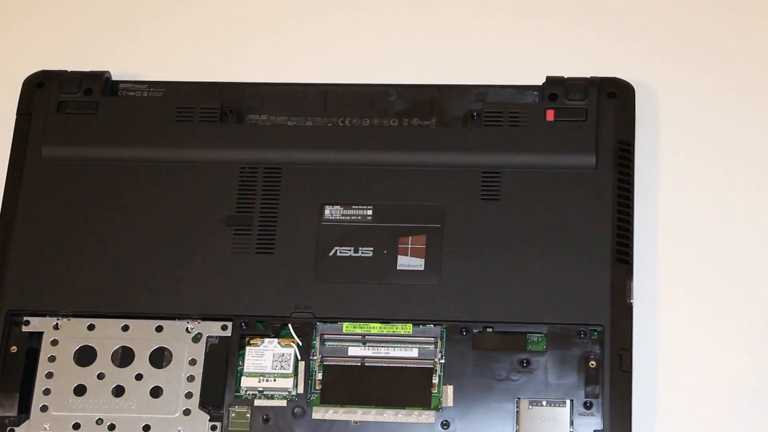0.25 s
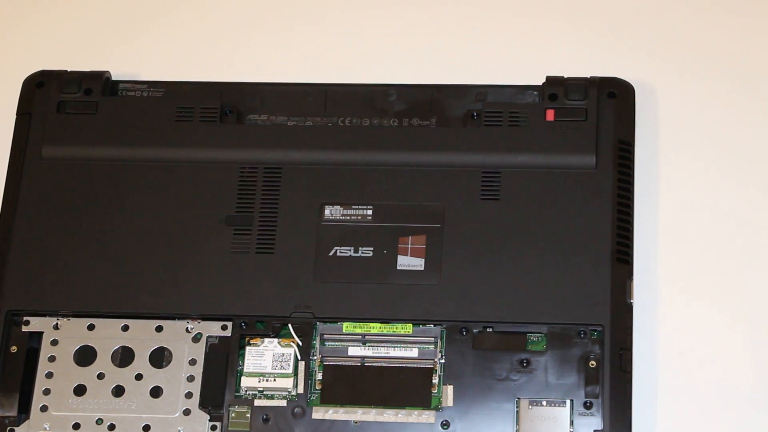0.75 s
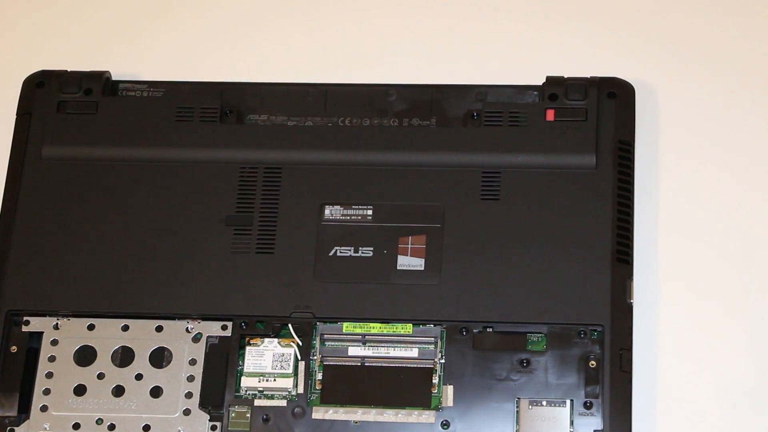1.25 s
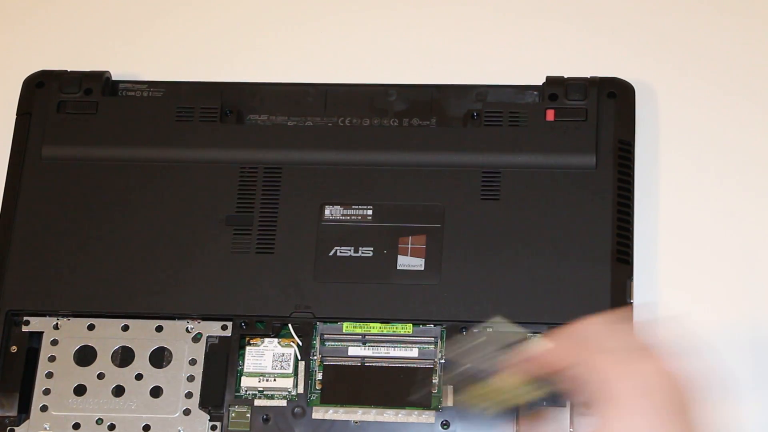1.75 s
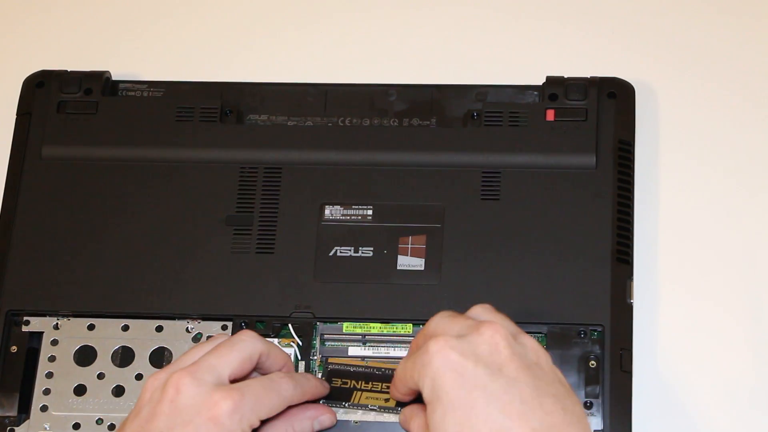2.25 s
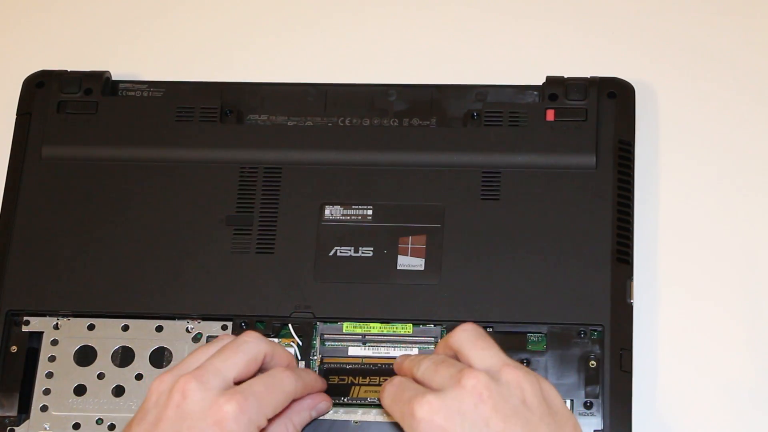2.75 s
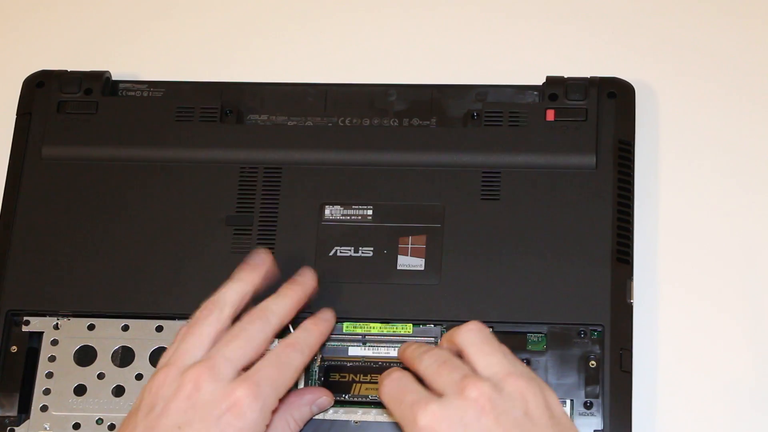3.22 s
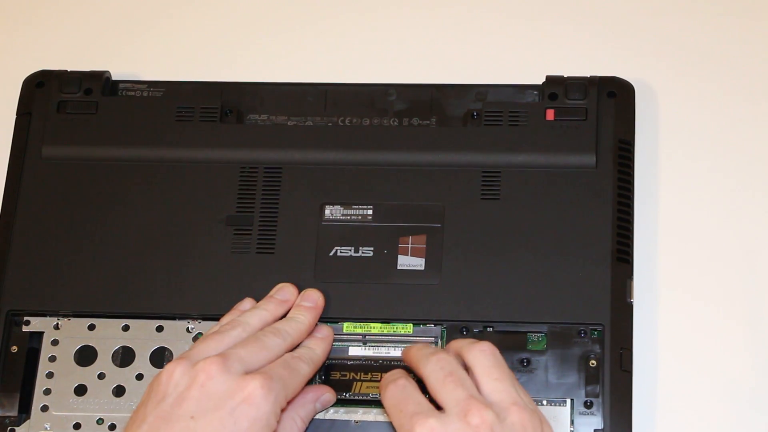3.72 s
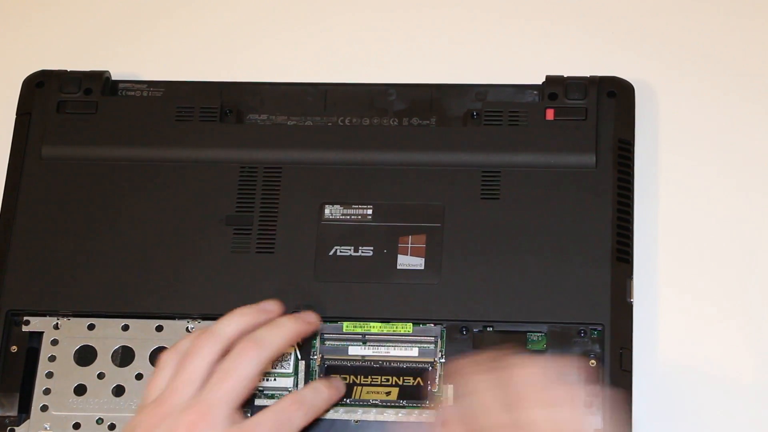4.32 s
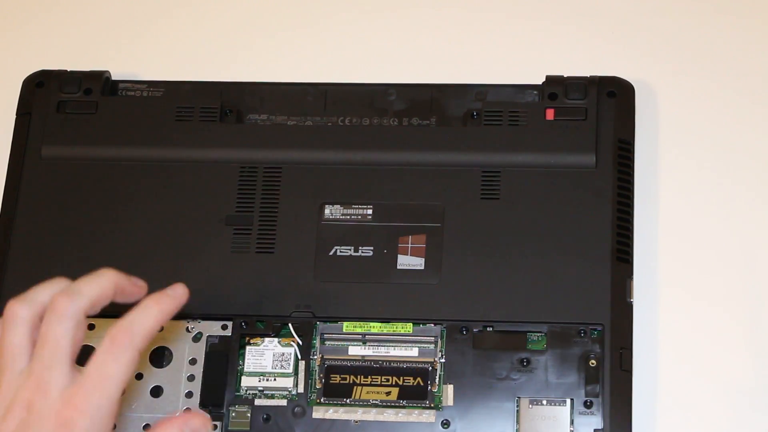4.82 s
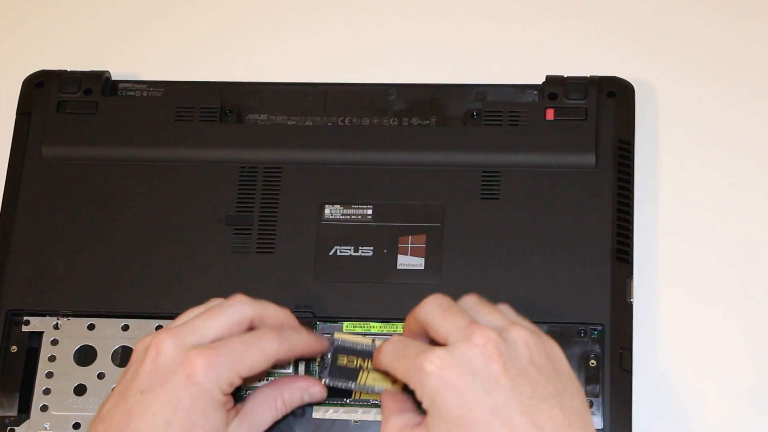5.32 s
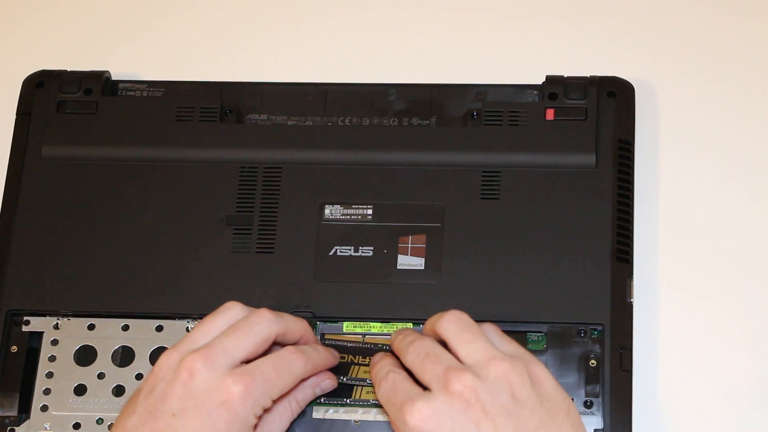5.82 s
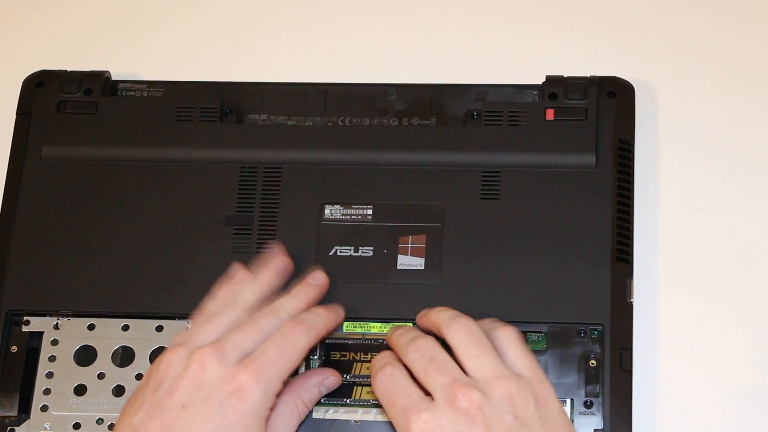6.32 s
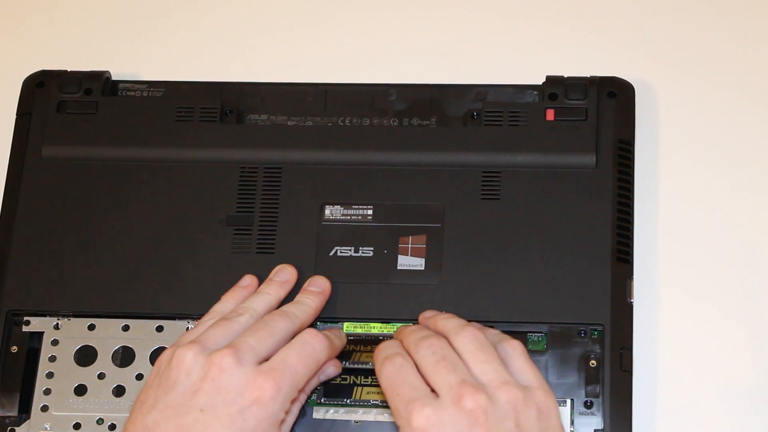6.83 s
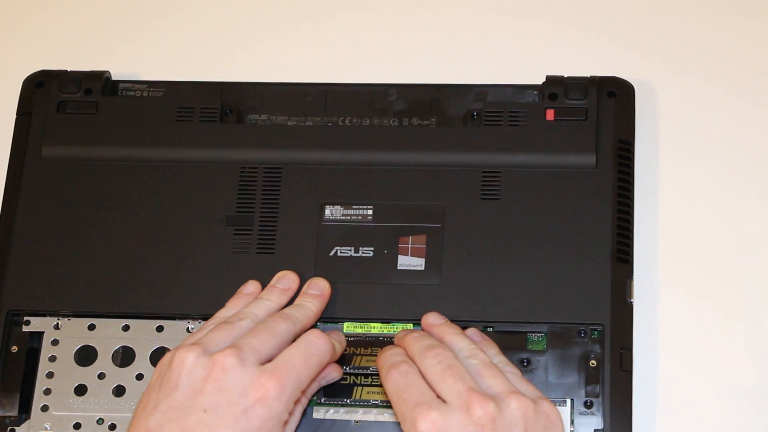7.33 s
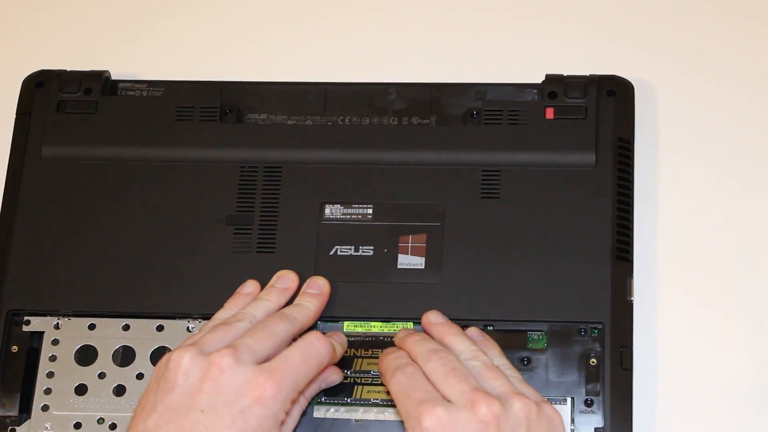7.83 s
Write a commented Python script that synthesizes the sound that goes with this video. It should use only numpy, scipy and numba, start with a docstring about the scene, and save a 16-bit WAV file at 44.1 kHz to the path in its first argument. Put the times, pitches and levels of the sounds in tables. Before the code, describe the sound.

Two small circuit boards are fitted into the underside of a laptop lying on a desk. A sharp snap comes early, then light plastic clicks, taps and fingertip scuffs. Midway a latch snaps loudly, with a brief metallic ring and a low thump from the desk. Softer ticks and scrapes follow. One microphone above the desk picks up a bare room's short echo and a low ventilation hum.

```python
"""Circuit boards snapping into a laptop.

Two small boards are slid into slots in the underside of a laptop lying on a desk, then pressed until
the latches snap. Taps ring the case, the board and the latches; fingertips scuff plastic; the desk
booms under the hands. A bare room echoes it over a low ventilation hum. One microphone above the desk."""
import sys
import numpy as np
from scipy import signal
from scipy.fft import rfft, irfft, next_fast_len
from scipy.io import wavfile
from scipy.ndimage import uniform_filter1d
from numba import njit

SR = 44100
rng = np.random.default_rng(int(sys.argv[2]) if len(sys.argv) > 2 else 0)


def transcribe(u):
    """Save the signal u as a 16-bit wav file named by the first command-line argument.

    u: samples, shape (n,) or (channels, n), limited to [-1, 1]; the rate is SR.
    q: integer samples, one column per channel.
    """
    v = np.clip(np.atleast_2d(u).T, -1, 1)
    q = np.round(v * 32767).astype(np.int16)
    wavfile.write(sys.argv[1], SR, q)


N = 355842

# hands moving on the case: t/s, dull rub/dB, bright scuff/dB
HAND_LEVELS = [(0.1, -52, -62), (0.399, -53, -60), (0.85, -92, -85), (1.19, -59.5, -89),
               (1.41, -56.5, -53.5), (1.6, -59, -67), (1.98, -67.5, -62.5), (2.2, -67, -58.5),
               (3.19, -59, -73), (3.37, -57, -55), (3.659, -76, -59.5), (4.25, -58, -57.5),
               (4.522, -63.5, -90), (4.85, -73.5, -47.5), (5.19, -62.5, -78), (5.9, -60, -57.5),
               (7.55, -68.5, -78), (8.07, -51.5, -43.5)]


def undb(db):
    """dB to gain."""
    return 10 ** (np.asarray(db) / 20)


def unit(x):
    """Scale to rms 1."""
    return x / np.sqrt(np.mean(x ** 2))


def ring(x, modes, passes=1):
    """Parallel resonances (f/Hz, width/Hz, level/dB); alternate signs avoid notches between them."""
    for _ in range(passes):
        x = sum((-1) ** k * undb(db) * signal.lfilter(*signal.iirpeak(hz, hz / width, SR), x)
                for k, (hz, width, db) in enumerate(modes))
    return x


def walk(rate_hz):
    """Random levels, each held for one period and slewed; spread near 1."""
    hold = int(SR / rate_hz)
    return uniform_filter1d(np.repeat(rng.standard_normal(N // hold + 1), hold), hold)[:N]


def curves(table):
    """The columns after a table's time column, one value a sample."""
    times, *columns = np.transpose(table)
    return [np.interp(np.arange(N) / SR, times, column) for column in columns]


@njit
def follow(x, attack, release):
    """Envelope with separate rates for rising and falling."""
    envelope, level = np.empty(len(x)), 1e-9
    for i in range(len(x)):
        level += (x[i] - level) * (attack if x[i] > level else release)
        envelope[i] = level
    return envelope


def air():
    """Steady room air and microphone hiss."""
    # spectrum of the room tone: f/Hz, relative level/dB
    spectrum = [(12, -53), (20, 2), (106, 2.5), (153, -3.5), (246, -8), (480, -14.5), (599, -18),
                (1270, -17), (1460, -28), (3670, -24), (5890, -28), (14400, -28.5), (15600, -32)]
    hz, db = np.transpose(spectrum)
    size = next_fast_len(N)
    bin_hz = np.arange(size // 2 + 1) * SR / size
    shape = undb(np.interp(np.log(bin_hz + 1), np.log(hz), db))
    return undb(-53) * unit(irfft(rfft(rng.standard_normal(size)) * shape, size)[:N])


def room(x):
    """Echoes off bare walls build within a millisecond, then die away, the treble first."""
    # reverberation bands: f/Hz, t60/s, level/dB
    bands = [(246, 0.4, -29), (607, 0.36, -26), (1400, 0.32, -33.5), (3000, 0.36, -33), (5640, 0.33, -35.5),
             (11680, 0.27, -39)]
    t = np.arange(SR // 2) / SR
    rise = np.minimum(t / 0.001, 1)
    tail = 0
    for hz, t60, db in bands:
        noise = ring(rng.standard_normal(len(t)), [(hz, hz, 0)], passes=2)
        tail += undb(db - 60 * t / t60) * rise * noise
    return signal.oaconvolve(x, tail)[:N]


def rumble():
    """Wavering lows: presses swell the desk's boom and the hum; moving hands stir the hollow case."""
    # resonances of desk, ventilation hum and hollow case: f/Hz, width/Hz, level/dB
    boom_modes = [(58.2, 20, -8), (93.2, 47, -6)]
    hum_modes = [(124.1, 7.4, 3.5), (172.1, 33, -1.5)]
    hollow_modes = [(210, 61, -0.5), (324, 53, 5), (470, 110, -0.5)]
    # the hum swells and sinks: t/s, level/dB
    hum_levels = [(0.0, -55.5), (1.1, -59), (1.6, -50), (3.1, -50), (3.7, -56.5), (8.07, -62.5)]
    # hands pressing down on the desk: t/s, t60/s, boom/dB, hum/dB
    presses = [(0.18, 0.54, -47, -71), (0.58, 0.91, -71, -48), (3.15, 1.3, -47.5, -56),
               (3.338, 0.34, -34, -50), (4.199, 0.65, -23, -29.5), (4.69, 0.8, -46.5, -44.5),
               (6.38, 1.76, -44, -46.5), (6.8, 0.37, -55.5, -54.5), (7.03, 0.64, -48, -37.5),
               (7.98, 1.1, -58, -48)]
    t, rise_s = np.arange(N) / SR, 0.012
    boom, hum = undb(-58.5), undb(curves(hum_levels)[0])
    hollow = undb(curves(HAND_LEVELS)[0] + 1)  # 1 dB over the dull rub
    for start, t60, boom_db, hum_db in presses:
        age = np.maximum(t - start, 0)
        swell = (1 - np.exp(-age / rise_s)) * undb(-60 * age / t60)
        boom += undb(boom_db) * swell
        hum += undb(hum_db) * swell
    return sum(gain * unit(ring(rng.standard_normal(N), modes, passes=2))
               for gain, modes in ((boom, boom_modes), (hum, hum_modes), (hollow, hollow_modes)))


def stick_slip(patchy_db):
    """Skin sticks and slips: dense grains of uneven size, in patches."""
    return rng.standard_normal(N) * undb(2.0 * walk(400) + patchy_db * walk(49))


def rubbing():
    """Hands rub slowly over the case and ring the plastic."""
    # plastic under a dull rub and a bright scuff: f/Hz, width/Hz, level/dB
    rub_modes = [(840, 430, -8), (1346, 200, -2.5), (2180, 380, -6.5)]
    scuff_modes = [(2300, 1900, -2.5), (3730, 590, 8.5), (4740, 6800, -3.5), (8060, 3300, -8.5)]
    return sum(undb(db) * unit(ring(stick_slip(patchy_db=2.2), modes))
               for db, modes in zip(curves(HAND_LEVELS), (rub_modes, scuff_modes)))


def swishes():
    """Fingertips and board edges scrape over plastic: a gritty hiss that swells fast and fades."""
    # quick strokes: t/s, length/ms, level/dB, centre f/Hz
    strokes = [(0.411, 55, -36, 380), (0.524, 130, -46, 4100), (0.579, 48, -32.5, 3700),
               (1.22, 110, -47.5, 3000), (1.278, 87, -39, 3860), (2.261, 37, -43, 3360),
               (2.509, 64, -45, 1990), (3.52, 110, -55.5, 3720), (3.613, 190, -53.5, 3520),
               (4.713, 118, -40, 3800), (4.724, 94, -47, 1020), (4.899, 54, -37, 3280),
               (5.368, 98, -53, 2000), (5.66, 42, -52.5, 1910), (5.854, 53, -38, 3260),
               (5.936, 33, -34, 1530), (6.356, 69, -45.5, 3400), (6.448, 113, -44, 3630),
               (6.499, 130, -48.5, 1400), (6.772, 15, -34.5, 2600), (6.796, 35, -37, 1400),
               (6.821, 37, -43.5, 3260), (7.025, 60, -46, 1050), (7.03, 125, -49, 257),
               (7.322, 35, -50.5, 3480), (7.394, 62, -44.5, 3570), (7.501, 56, -47, 3730),
               (7.914, 103, -42, 3650), (7.988, 120, -42, 3370)]
    out, friction = np.zeros(N), stick_slip(patchy_db=2.0)
    for start, ms, db, hz in strokes:
        span = slice(int(start * SR), int((start + ms / 1000) * SR))
        grit = friction[span]
        hiss = undb(db) * unit(ring(grit, [(hz, 0.92 * hz, 0)], passes=2))
        fizz_db = db - 21 + 4.5 * np.log2(hz / 1000)  # higher strokes fizz more
        fizz = undb(fizz_db) * unit(ring(grit, [(8630, 7300, 0)]))
        progress = np.minimum(np.arange(len(grit)) * 1000 / SR / ms, 1)
        out[span] += (hiss + fizz) * np.sin(np.pi * progress ** 0.45) ** 1.25
    return out


def struck_parts(blow):
    """How case, board, latch, treble crack and bare contact answer a blow, each scaled to peak 1."""
    # what every tap rings: f/Hz, width/Hz, level/dB
    case_modes = [(203, 113, 6.5), (316, 70, 9.5), (514, 196, 4), (588, 11, -3.5), (810, 207, 8.5)]
    board_modes = [(1061, 160, -8), (1400, 190, 0), (1796, 200, -6)]
    latch_modes = [(2090, 106, 13.5), (2713, 290, 3.5), (3030, 720, 5), (3724, 203, 9), (4130, 600, 3.5),
                   (4870, 280, -3)]
    crack_modes = [(6100, 1900, 6), (6940, 900, -1.5), (7860, 20000, 2.5), (10800, 900, -10)]
    parts = []
    for modes, ring_db in ((case_modes, 1.7), (board_modes, 4.7), (latch_modes, 12), (crack_modes, .51)):
        low, high = modes[0][0], modes[-1][0]
        band = [(np.sqrt(low * high), 2.074 * (high - low), 0)]
        ringing_click = ring(blow, band) + undb(ring_db) * ring(blow, modes)
        parts.append(ring(ringing_click, band, passes=2))
    contact = ring(blow, [(1900, 4800, 0)], passes=3)  # over in one cycle
    return [part / np.abs(part).max() for part in parts + [contact]]


def taps():
    """Sharp blows with chatter: returns the sound at the microphone and three feeds to the walls."""
    # contacts: t/s, click/dB, case thud/dB, crack/dB, chatter/ms, struck spot f/Hz, ping there/dB
    contacts = [(0.4105, -21, -26, -30, .3, 3300, -6), (0.5494, -30, -58, -45, .5, 4500, 1),
                (0.5638, -19, -17.5, -31, 1.2, 3400, 12), (0.5695, -9.5, -13.5, -50, -1, 940, 8),
                (0.5664, 1, -8.5, -12, 0.071, 1580, -10.5), (0.5816, -17, -38, -34, 1.4, 3730, 0),
                (0.594, -13.5, -38, -45, 0.32, 1360, 13), (1.2424, -16.5, -28, -53, 0.067, 5400, 4),
                (1.2706, -26, -38, -34, 2.1, 3030, 8), (1.294, -24.5, -38, -24.5, 8.5, 4560, 14),
                (1.4833, -35.5, -41.5, -38, 0.45, 2270, 0), (1.739, -34, -50, -53, 0.3, 2060, 22),
                (1.957, -32.5, -38.5, -57, 1.4, 2800, 8), (1.966, -27, -68, -34, 0.25, 3420, 3),
                (2.0666, -35.5, -44, -48, 3.6, 2300, 8), (2.1372, -33, -58, -33.5, 2.7, 1340, 3),
                (2.149, -32, -39, -39, 3.4, 1400, -1), (2.257, -27.5, -44, -35, 1.9, 3800, 11),
                (2.2665, -28, -32.5, -37, 0.36, 3570, 6), (2.3689, -27, -32.5, -23, 2, 1440, 3.5),
                (2.3849, -25, -34.5, -45, 1.3, 1500, 9.5), (2.4917, -31.5, -48, -45, 3.4, 1300, 12),
                (2.527, -34.5, -50, -39.5, 5.3, 2650, 0), (2.601, -35, -34, -37, 1.1, 1446, 5),
                (2.7064, -27.5, -47, -30, 1.7, 4180, 4), (2.7286, -26, -31.5, -23, 0.25, 3470, 8),
                (2.8534, -14, -28, -13, 1.8, 4640, 8.5), (2.8807, -20, -31.5, -26.5, 2.8, 3280, 1),
                (2.9138, -24, -27.5, -25, 0.1, 1230, 5), (2.962, -33.5, -39.5, -36, 2, 3580, 4),
                (3.1345, -29, -39.5, -35, 2.8, 2830, 8), (3.1941, -40, -47, -33.5, 2, 3300, 4),
                (3.3347, -34.5, -53, -36.5, 2.1, 2860, 3), (3.3964, -56, -35, -30, 2.8, 3640, 4),
                (3.403, -20, -45, -34, 0.3, 1250, 8), (3.8364, -34, -38, -52, 1.5, 1470, 4),
                (3.8645, -28, -37.5, -28.5, 0.22, 2680, 8), (3.8884, -27, -36, -31.5, 2, 3140, 7),
                (3.9041, -28, -35.5, -32, 1.2, 1470, 4), (3.9218, -20, -33, -40, 0.3, 1420, 8),
                (4.006, -40, -60, -55, 1, 3450, 14), (4.0559, -27.5, -36.5, -34, 2.3, 1830, -6),
                (4.2008, -2, -14, -5.5, 2.2, 3280, 8), (4.203, 4, -15, -7, 1.5, 2560, 6),
                (4.2046, -2, -30, 4.5, 1.6, 1370, 10), (4.6926, -31, -63.5, -31.5, 2.9, 4500, 23),
                (4.7987, -28, -37, -43, 0.31, 3660, -9), (4.8126, -31, -50, -46, .2, 3800, -3),
                (4.8162, -26, -55, -44, 0.31, 3850, -3), (5.0726, -28, -39, -22.5, 0.37, 1630, 2),
                (5.368, -39, -45, -52, 1.9, 2370, 4.5), (5.4096, -30.5, -42.5, -39, 2.2, 1760, 1),
                (5.445, -24, -31, -63.5, 1, 2020, 4), (5.4606, -28, -37.5, -66, 1.5, 1830, -4),
                (5.6872, -34.5, -40.5, -43, 1.1, 3000, 6), (5.7015, -23, -48, -38, 1, 3550, 24),
                (5.723, -46, -58, -57, 2.5, 3700, 8), (5.8593, -26.5, -27, -29, 1.9, 1400, 5),
                (5.866, -23.5, -30.5, -32, 3.5, 1400, -1), (5.938, -25.5, -30, -31.5, 1.7, 990, 8),
                (6.0659, -27.5, -32.5, -40.5, 4.9, 1650, -2), (6.09, -22.5, -34.5, -50, 0.76, 3300, 6),
                (6.1296, -24, -33.5, -35, 3.8, 1590, 13), (6.397, -29, -38, -28.5, 0.91, 2240, -1),
                (6.51, -35, -39, -57, 0.65, 1156, 10), (6.7119, -31, -38.5, -29.5, 2.2, 2900, 5),
                (6.7327, -32, -31, -57, 2.5, 1145, 6), (6.7801, -16, -24, -30, 0.2, 1150, 0),
                (6.9628, -29.5, -31.5, -42.5, .8, 1300, 0), (6.9668, -31, -31, -57.5, .3, 1690, 2),
                (7.0185, -27, -34, -48, .3, 1120, 6), (7.031, -35.5, -39, -54.5, .6, 1400, 6),
                (7.051, -31.5, -38, -46, 1.4, 1220, 13), (7.1018, -25, -26.5, -57, 0.29, 1240, 10.5),
                (7.3058, -30, -42.5, -35.5, 1.9, 1360, 5), (7.364, -28.5, -33, -56, 2.9, 1510, 5),
                (7.377, -26, -38, -36, 0.52, 1287, 5), (7.8753, -35.5, -47, -38.5, 2, 3500, -3),
                (8.007, -24, -50, -27.5, 1.2, 2530, 10), (8.0169, -28.5, -34, -35, 2.2, 1660, 8)]
    # the latch's metal arms ringing on: f/Hz, width/Hz, level/dB
    arm_modes = [(1453, 10, 30), (2724, 8, 27), (4301, 5.5, 38), (8888, 12, 20)]
    size = 1024
    t = np.arange(size) / SR
    blow = 1. * (t == 0)
    case, board, latch, crack, contact = struck_parts(blow)
    direct, arm_kicks, to_walls = np.zeros(N + size), np.zeros(N + size), np.zeros((3, N + size))
    for k, (start, click_db, case_db, crack_db, chatter_ms, hz, ping_db) in enumerate(contacts):
        at, levels = int(start * SR), [case_db, click_db, crack_db]
        # higher, harder blows are more latch than board
        lean_db = 1.5 * np.log2(hz / 2050) + 0.04 * (click_db + 29.5)
        body = undb(-max(lean_db, 0)) * board + undb(min(lean_db, 0)) * latch
        click = contact + undb(.6 * ping_db) * body  # a dead spot gives little but the contact
        layers = np.array([case, click, crack])
        layers += ring(layers, [(hz, 0.18 * hz, ping_db)])  # favours modes near the spot's pitch
        # lighter, lower blows last longer, so are duller
        cutoff_hz = 4500 * undb(0.37 * (max(levels) + 31) + lean_db)
        layers = signal.lfilter([1], [1, -np.exp(-2 * np.pi * cutoff_hz / SR)], layers)
        age = 1000 * t / max(chatter_ms, .1)
        chatter = 0.48 * rng.standard_normal(size) * (np.exp(-age) - 0.97 * np.exp(-4 * age))
        tap = signal.fftconvolve((blow + chatter)[None], layers, axes=1)[:, :size]
        tap = undb(levels)[:, None] * tap / np.abs(tap).max(axis=1, keepdims=True)
        direct[at:at + size] += tap.sum(axis=0)
        # the walls get each layer at the same energy, without chatter
        wall_gains = np.sqrt(np.sum(tap ** 2, axis=1) / np.sum(layers ** 2, axis=1))
        to_walls[k % 3, at:at + size] += wall_gains @ layers
        arm_kicks[at] = max(undb(crack_db) - .3, 0)  # only hard cracks shake the arms
    return (direct + ring(arm_kicks, arm_modes))[:N], to_walls[:, :N]


def scene():
    """One microphone above the desk: left and right are alike but for a trace of noise."""
    direct, to_walls = taps()
    friction = rubbing() + swishes()
    to_walls[0] += 0.71 * friction
    mid = direct + friction + sum(room(feed) for feed in to_walls) + rumble() + air()
    side = undb(-79.5) * ring(rng.standard_normal(N), [(9630, 4000, 12.4), (262, 290, 16), (30, 31, 17)])
    return np.array([mid + side, mid - side])


def record(dry):
    """The recorder's limiter is too slow for the loudest snaps, which clip; the top is cut."""
    threshold_db, ratio, attack_ms, release_ms, top_hz = -21, 3.5, 8.8, 58, 15800
    envelope = follow(np.abs(dry).max(axis=0), 1000 / SR / attack_ms, 1000 / SR / release_ms)
    gain = np.minimum(undb(threshold_db) / envelope, 1) ** (1 - 1 / ratio)
    lowpass = signal.ellip(10, .2, 70, top_hz, fs=SR, output="sos")
    return signal.sosfilt(lowpass, np.clip(dry * gain, -1, 1))


dry = scene()
out = record(dry)
transcribe(out)
```